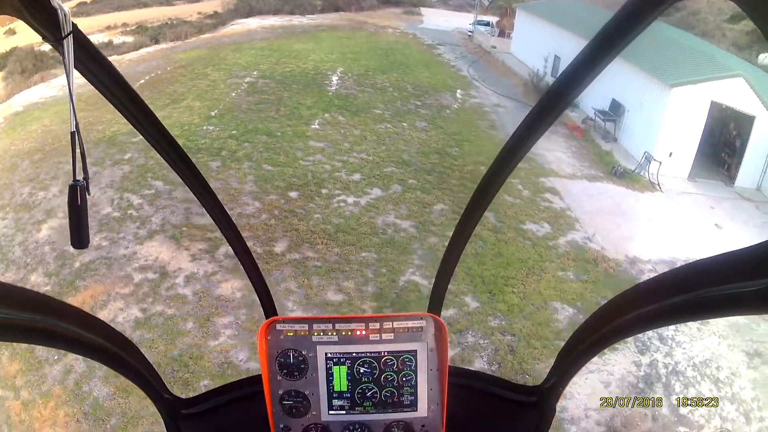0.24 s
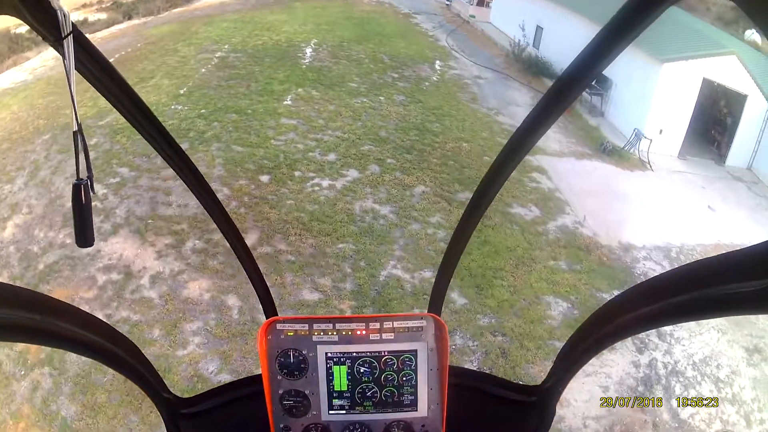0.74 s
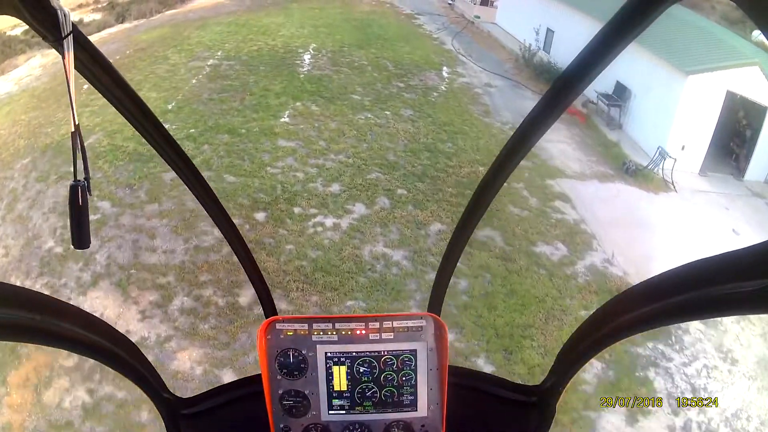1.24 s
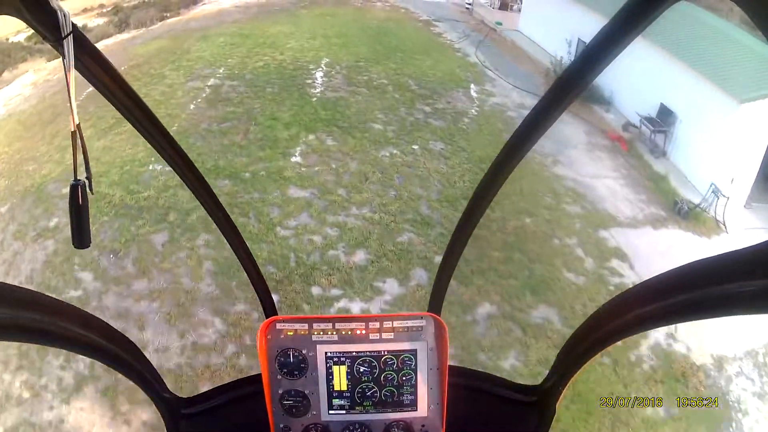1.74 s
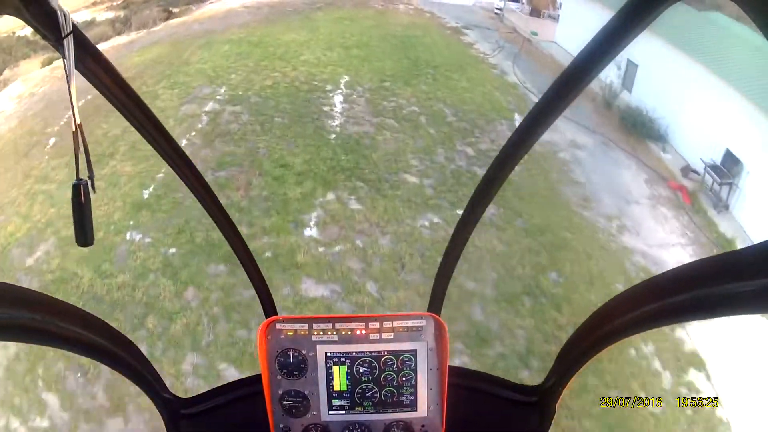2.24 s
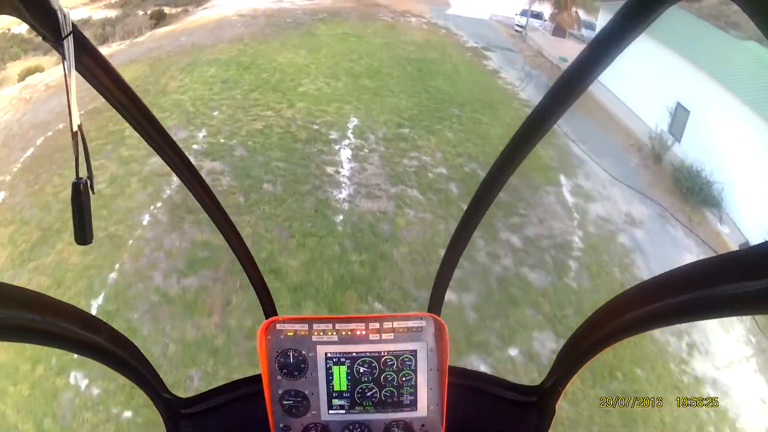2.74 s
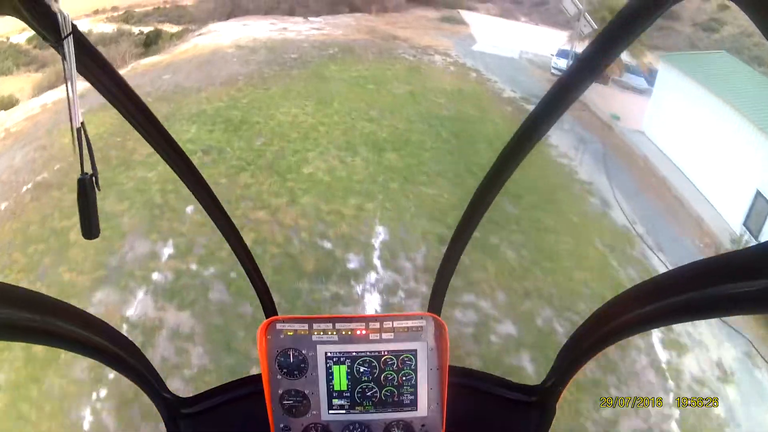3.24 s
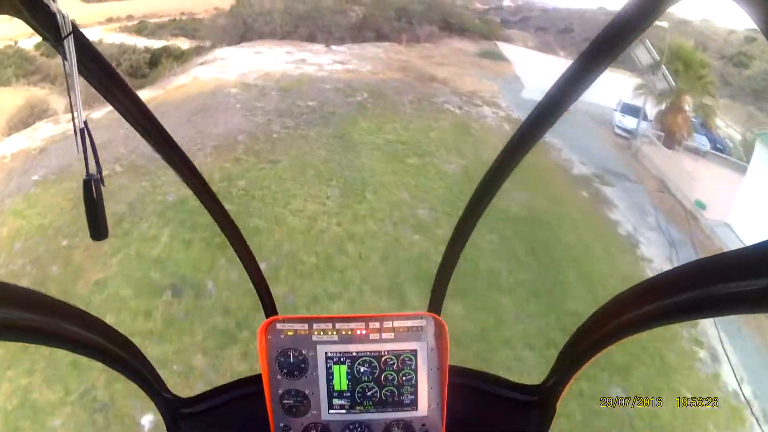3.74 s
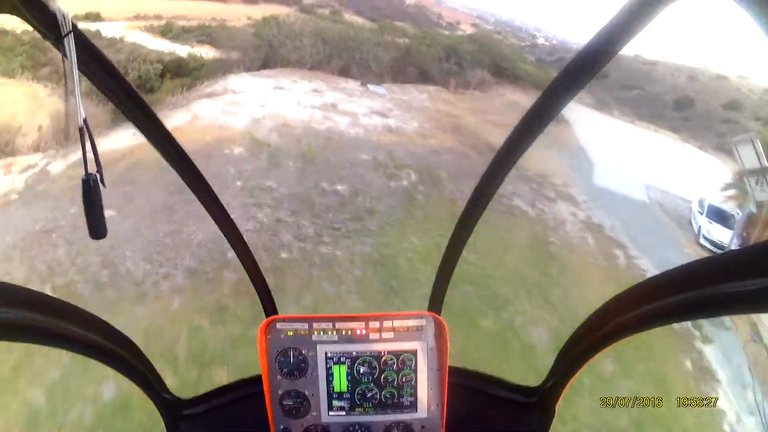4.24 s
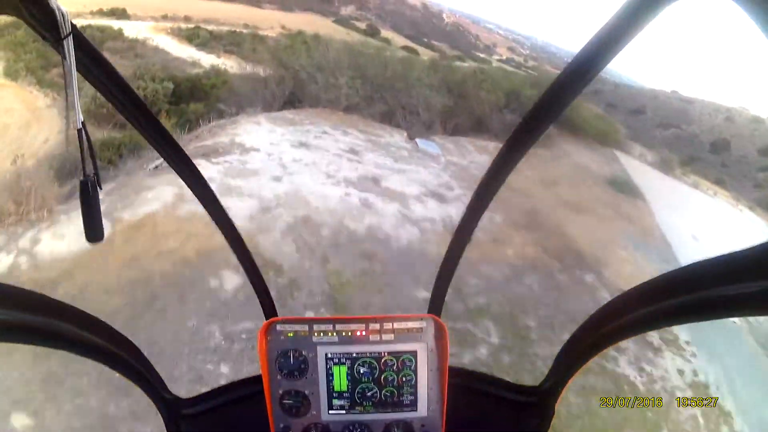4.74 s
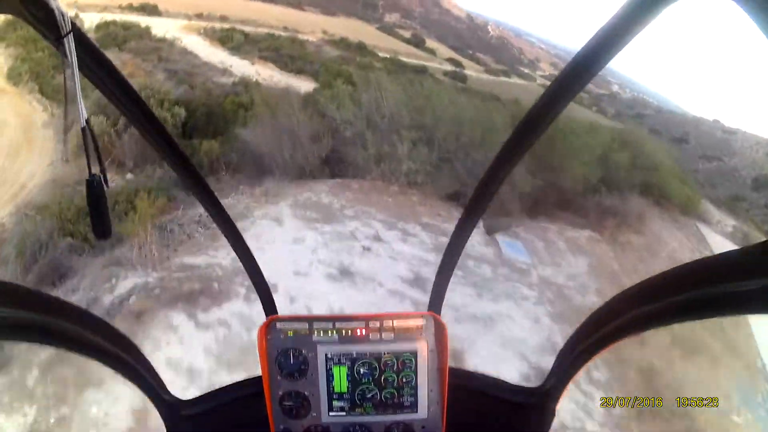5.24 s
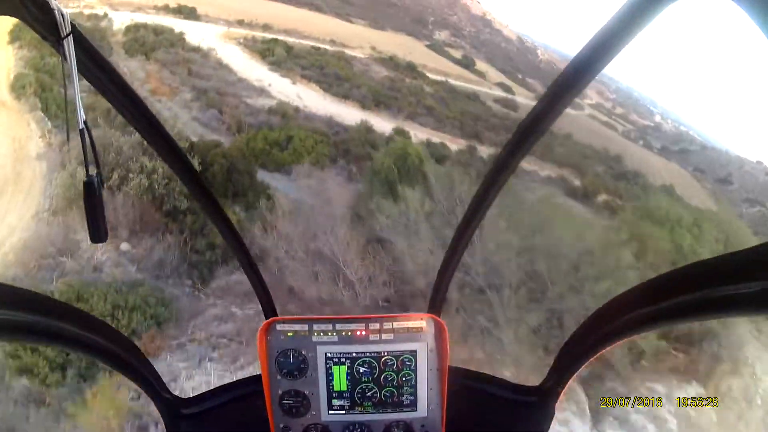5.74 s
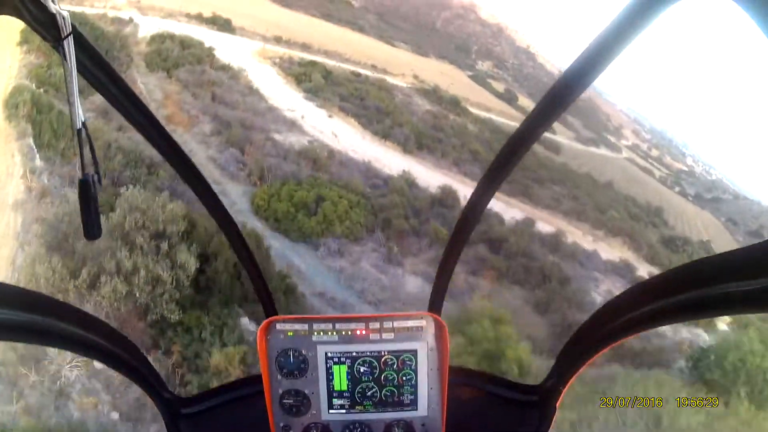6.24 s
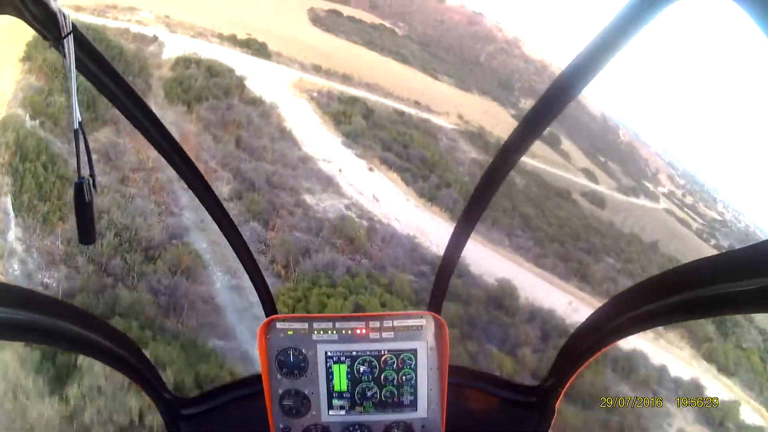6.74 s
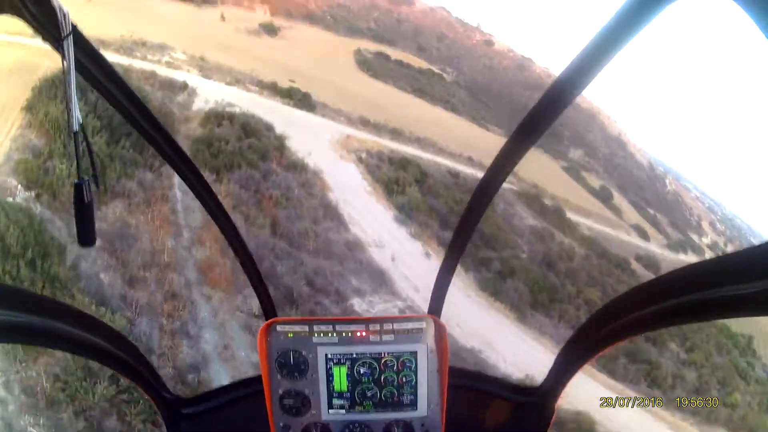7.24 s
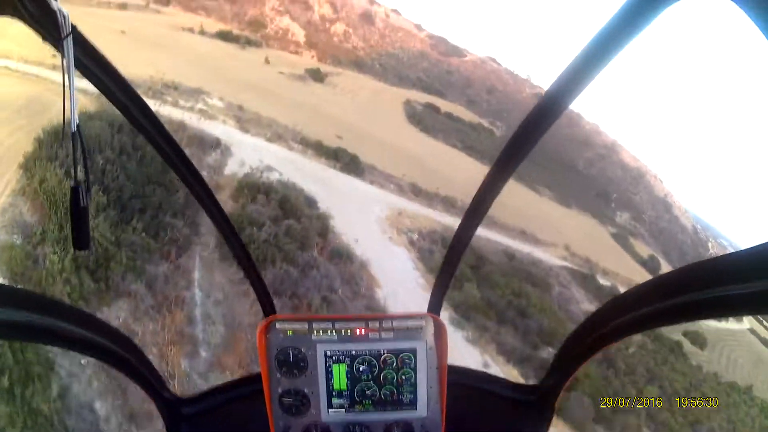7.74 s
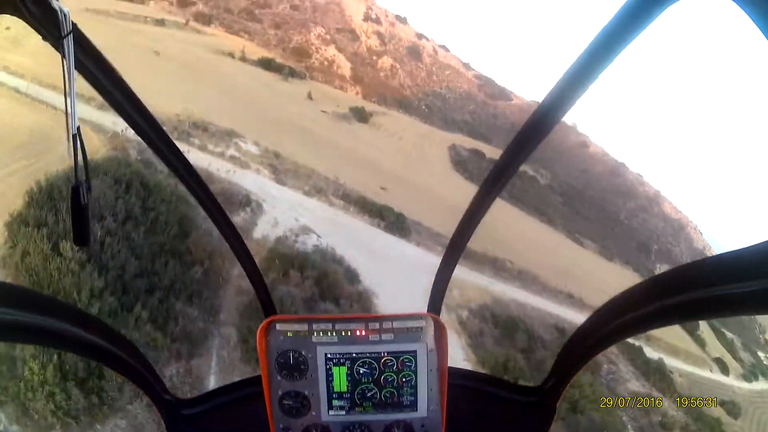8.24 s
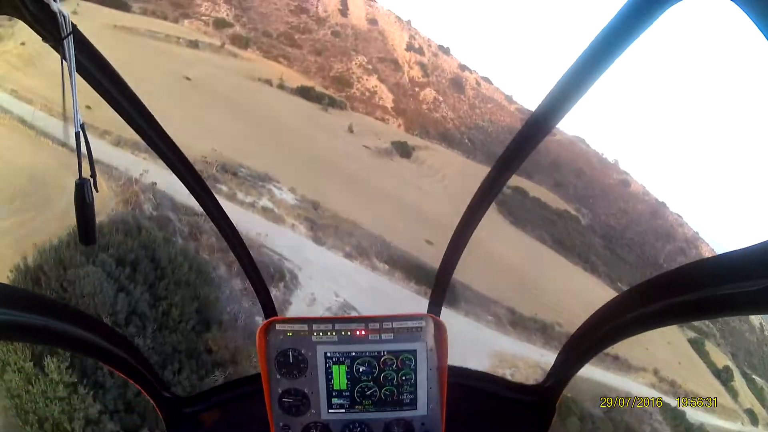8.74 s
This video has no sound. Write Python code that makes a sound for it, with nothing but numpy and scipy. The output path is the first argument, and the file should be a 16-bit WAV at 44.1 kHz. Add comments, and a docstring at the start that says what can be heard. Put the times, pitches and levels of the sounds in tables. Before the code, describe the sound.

Loud helicopter cockpit noise: shrill steady turbine gear whine and low rotor drone dip in pitch, climb back, then ease at cruise, harshly overloaded.

```python
"""Inside the cabin of a light turbine helicopter that lifts away, over about nine seconds. At first the drive
shaft sags for a second, and every gear whine, rotor and shaft drone locked to it sinks too. The shaft then
recovers and overshoots while, from two to four seconds, the forward speed climbs to cruise. From there the
pitch eases back and the cabin stays louder. Shaped noise makes the airframe roar throughout, and the whole din
overdrives the recorder's input."""
import sys
import numpy as np
from scipy import signal
from scipy.io import wavfile
from scipy.ndimage import uniform_filter1d, map_coordinates

SR = 44100
rng = np.random.default_rng(int(sys.argv[2]) if len(sys.argv) > 2 else 0)


def natural_amplitude(level_db):
    """Convert a level in decibels to a linear amplitude factor, elementwise."""
    exponent = np.asarray(level_db, float) / 20
    return 10 ** exponent


def to_wav(sig):
    """Store sig (one row per channel, or 1-D mono) as 16-bit WAV at the path in sys.argv[1].

    Samples outside -1..1 are clipped; the rate is SR.
    """
    pcm = np.clip(np.atleast_2d(sig), -1, 1) * 32767
    pcm = np.round(pcm).astype(np.int16)
    wavfile.write(sys.argv[1], SR, pcm.T)  # frames by channels


N = 396459  # length in samples


def unit(x):
    """Scales a signal to rms 1."""
    return x / np.sqrt(np.mean(x ** 2) + 1e-20)


def curves(rows):
    """Draws straight lines between the rows: one value per sample for each column after the time."""
    times, *columns = np.transpose(rows)
    return np.array([np.interp(np.arange(N) / SR, times, column) for column in columns])


def wobble(rate):
    """A smooth random curve through rate knots a second."""
    knots = rng.standard_normal(int(N * rate / SR) + 4)
    return map_coordinates(knots, [np.arange(N) * rate / SR])


def levels(rows, drift_hz, airspeed):
    """Each tone slides along a frame resonance as the shaft drifts, and changes with forward speed."""
    return [db + slope * drift_hz + bend * drift_hz ** 2 + cruise_db * airspeed
            for db, slope, bend, cruise_db in rows]


def tone(cycles, db, flutter_db, flutter_hz, sway):
    """A sine of rms db whose level and phase (sway, radians) waver as the structure shakes."""
    shake = wobble(flutter_hz)
    phase = 2 * np.pi * (cycles + rng.random()) + sway * wobble(flutter_hz)
    return np.sqrt(2) * natural_amplitude(db + flutter_db * shake) * np.sin(phase)


def noise(spectrum, patchy_db):
    """Coloured noise of rms 1, with patches of random gain over time and frequency."""
    bins = signal.stft(rng.standard_normal(N + 2048), nperseg=2048)[2]
    patches = uniform_filter1d(rng.standard_normal(bins.shape), size=4, axis=0)
    patches = unit(uniform_filter1d(patches, size=4, axis=1))
    f, db = np.transpose(spectrum)
    log_f = np.log(np.fft.rfftfreq(2048, 1 / SR) + 1)  # + 1 Hz keeps the log finite at zero
    colour = np.interp(log_f, np.log(f), db, left=-120, right=-120)
    shaped = bins * natural_amplitude(colour[:, None] + patchy_db * patches)
    return unit(signal.istft(shaped, nperseg=2048)[1][:N])


def gear_whine(turns, gear_db):
    """Meshing teeth sing at fixed multiples of the shaft angle."""
    # main mesh tones: one order each [cycles per shaft turn]
    gear_orders = [39, 45, 34, 37, 7.797, 156]
    return sum(tone(order * turns, db, flutter_db=0.3, flutter_hz=12, sway=0.064)
               for order, db in zip(gear_orders, gear_db))


def drones(turns, drift_hz, airspeed):
    """Low tones of rotor blades and shafts turn with the same drive shaft."""
    # 3rd and 5th blade-pass overtone, then three shaft tones: one order each [cycles per shaft turn]
    drone_orders = [1.437, 2.392, 2, 2.249, 2.598]
    # one row per order, ahead of the mix gains:
    # level/dB rms at zero drift and airspeed, slope/(dB/Hz drift), bend/(dB/Hz^2), added in cruise/dB
    drone_levels = [(-33, 5.5, -15, 9), (-35.5, -9.5, 5, 8), (-38, -15, -12, -0.5), (-24.5, 6, 1.5, 0.3),
                    (-34, -7, 4, -1)]
    drone_db = levels(drone_levels, drift_hz, airspeed)
    return sum(tone(order * turns, db, flutter_db=.9, flutter_hz=2.512, sway=0.19)
               for order, db in zip(drone_orders, drone_db))


def faint_tones(turns, drift_hz, airspeed, upper_mesh_db):
    """Weaker tones of the train: steady ones, swelling ones, and shaft sidebands of the upper mesh."""
    # steady tones and sidebands, ahead of the mix gains: order/(cycles per shaft turn), level/dB rms
    steady = [(0.478, -45.7), (1.772, -37.0), (1.919, -38.0), (3, -44.0), (5.2, -46.3), (6.476, -37.6),
              (7, -40.9), (7.315, -41.5), (8.038, -39.6), (9.48, -41.9), (10.4, -41.5), (12, -47.1),
              (18, -44.9), (19, -47.1), (21, -47.0), (23, -49.9), (26, -45.0), (32, -44.2), (33, -39.2),
              (34.273, -37.7), (36, -42.2), (36.402, -37.0), (38, -39.1), (38.044, -38.4), (38.522, -40.2),
              (40, -36.2), (41.249, -39.1), (42.686, -41.9), (49.046, -45.7), (52.947, -49.1), (117, -49)]
    # tones that swell and fade: one order each [cycles per shaft turn]
    swell_orders = [6, 9, 17, 26.471, 40.437, 78, 4.499]
    # one row per order, ahead of the mix gains:
    # level/dB rms at zero drift and airspeed, slope/(dB/Hz drift), bend/(dB/Hz^2), added in cruise/dB
    swell_levels = [(-32.5, 8.5, -3, -5), (-35, -8, -20, 0.5), (-37, 4, 2, -2.7), (-36, 3, 5, -3),
                    (-41.5, 1, -3, 10), (-38, 3.5, 25, -5), (-38.5, -6.5, -4, -3)]
    # shaft sidebands: order/(cycles per shaft turn), level/dB relative to the softened upper mesh
    sidebands = [(41, -10), (42, -13), (43, -13), (44, -15), (48, -16)]
    swelling = zip(swell_orders, levels(swell_levels, drift_hz, airspeed))
    softened_db = (upper_mesh_db + np.mean(upper_mesh_db)) / 2  # half of the mesh's swing
    beside_mesh = [(order, softened_db + db) for order, db in sidebands]
    return sum(tone(order * turns, db, flutter_db=1.76, flutter_hz=1.393, sway=0.11)
               for order, db in [*steady, *swelling, *beside_mesh])


def drivetrain(airspeed):
    """One drive shaft sets the pitch of every tone; its drift from 38 Hz also moves many of their levels."""
    # drive shaft speed, before smoothing: t/s, f/Hz (turns per second)
    shaft_speed = [(0, 38.085), (.33, 37.871), (.67, 37.602), (1, 37.49), (1.33, 37.539), (1.66, 37.622),
                   (2.33, 37.906), (2.66, 38.015), (3.33, 38.19), (3.99, 38.33), (4.9, 38.395),
                   (5.9, 38.34), (6.32, 38.254), (6.9, 38.1), (7.65, 38.062), (8.5, 37.982), (8.98, 37.988)]
    # one row per gear mesh, ahead of the mix gains:
    # level/dB rms at zero drift and airspeed, slope/(dB/Hz drift), bend/(dB/Hz^2), added in cruise/dB
    gear_levels = [(-18.5, 4.5, -8, -0.05), (-22.5, -16, -17.5, -1.44), (-32.5, 12, 14, -1.8),
                   (-32.5, -2.5, -4, -1.1), (-23, 0.2, -7, -5), (-43, 11, -51, -5)]
    governed_hz = 38
    shaft_hz = uniform_filter1d(curves(shaft_speed)[0], size=SR // 4)
    turns = np.cumsum(shaft_hz) / SR
    drift_hz = shaft_hz - governed_hz
    gear_db = levels(gear_levels, drift_hz, airspeed)
    whine = gear_whine(turns, gear_db)
    drone = drones(turns, drift_hz, airspeed)
    faint = faint_tones(turns, drift_hz, airspeed, upper_mesh_db=gear_db[1])
    return whine + natural_amplitude(1.37) * drone + natural_amplitude(-0.47) * faint


def gearbox_rush():
    """The gearbox housing rushes: noise through its own resonances."""
    # colour of the rush, relative: f/Hz, level/dB per Hz
    rush_colour = [(800, -17), (1100, -17.5), (1270, 1.5), (1400, 3), (1550, -1), (1700, 0), (1850, -6.5),
                   (2200, -18.5), (3000, -19), (4500, -35), (7000, -39), (16000, -78)]
    return noise(rush_colour, patchy_db=0.2)


def cabin_boom():
    """The cabin shell booms: noise through its lower resonances."""
    # colour of the boom, relative: f/Hz, level/dB per Hz
    boom_colour = [(120, -30), (190, -19), (250, -1.5), (310, -3), (400, -6), (480, -17), (700, -10),
                   (900, -15.5), (1200, -26)]
    return noise(boom_colour, patchy_db=-0.05)


def downwash_buffet():
    """Downwash buffets the cabin: low noise, uneven in time and frequency."""
    # colour of the buffet, relative: f/Hz, level/dB per Hz
    buffet_colour = [(10, -34), (20, -28), (44, -26), (62, -12.5), (90, -1.5), (110, -17.5), (140, -36),
                     (200, -17.5), (300, -70)]
    return noise(buffet_colour, patchy_db=1.5)


def airframe(airspeed):
    """Three bands of broadband roar, each balanced by forward speed."""
    # rows buffet, boom, rush, ahead of the cabin gain: level/dB rms at zero airspeed, added in cruise/dB
    roar_levels = [(-30.5, 5), (-26, -3.5), (-25.5, -1.3)]
    buffet_db, boom_db, rush_db = (db + cruise_db * airspeed for db, cruise_db in roar_levels)
    rush = natural_amplitude(rush_db) * gearbox_rush()
    boom = natural_amplitude(boom_db) * cabin_boom()
    buffet = natural_amplitude(buffet_db) * downwash_buffet()
    return rush + boom + buffet


def scene():
    """Drivetrain tones over the airframe roar, the whole cabin swelling with forward speed."""
    # forward speed from hover to cruise: t/s, share [0-1]
    airspeed_curve = [(0, 0.2), (2.3, 0.1), (3.4, 0.39), (4.2, 1), (5, 0.8), (7, 0.96), (8.99, 0.92)]
    hover_db, cruise_adds_db = -0.88, 1.3
    airspeed = curves(airspeed_curve)[0]
    cabin = drivetrain(airspeed) + airframe(airspeed)
    return (natural_amplitude(hover_db + cruise_adds_db * airspeed) * cabin)[None]


def overdrive(x, drive_db, top, bias, hardness):
    """The converter's input flattens the peaks at top (full scale 1), slightly off centre by bias."""
    driven = x * natural_amplitude(drive_db) + bias
    return driven / (1 + np.abs(driven / top) ** hardness) ** (1 / hardness)


def low_pass(x):
    """Removes everything above the highest recorded frequency."""
    return signal.sosfilt(signal.butter(12, 15920, fs=SR, output="sos"), x)


def record(dry):
    """Clipping, then a coupling capacitor that lets the flat tops droop."""
    flat = overdrive(dry, drive_db=4.0, top=.26, bias=0.0088, hardness=62.0)
    droop_hz = 19
    capacitor = signal.butter(1, droop_hz, 'high', fs=SR)
    coupled = signal.lfilter(*capacitor, flat - flat.mean())
    return low_pass(coupled)


dry = scene()
out = record(dry)
to_wav(out)
```